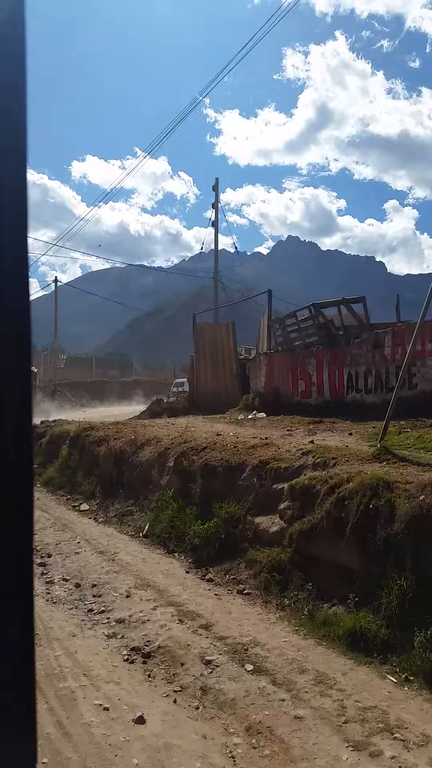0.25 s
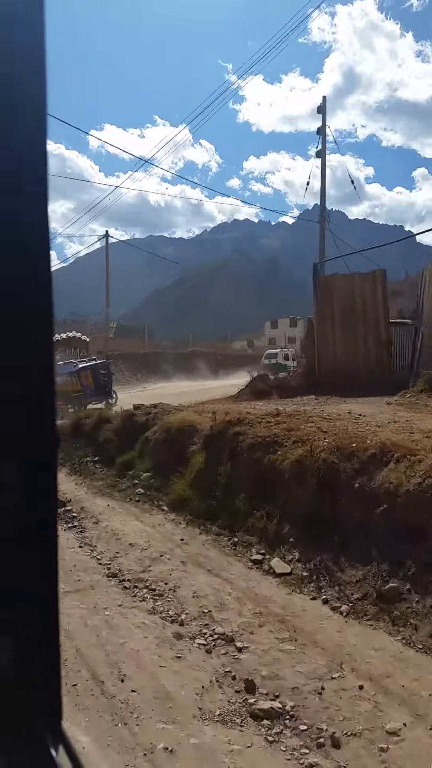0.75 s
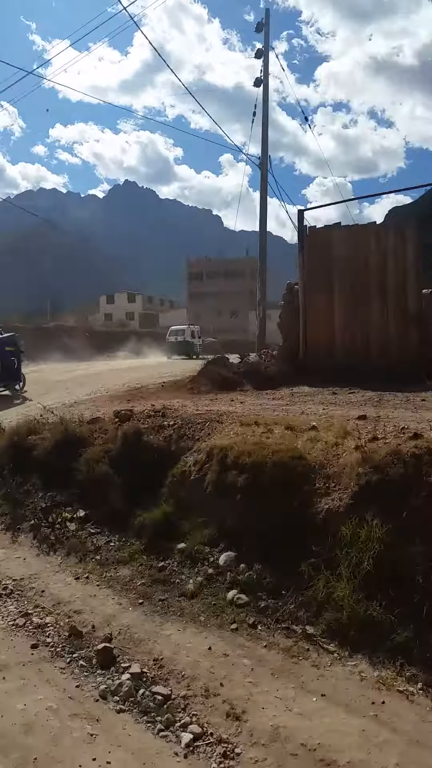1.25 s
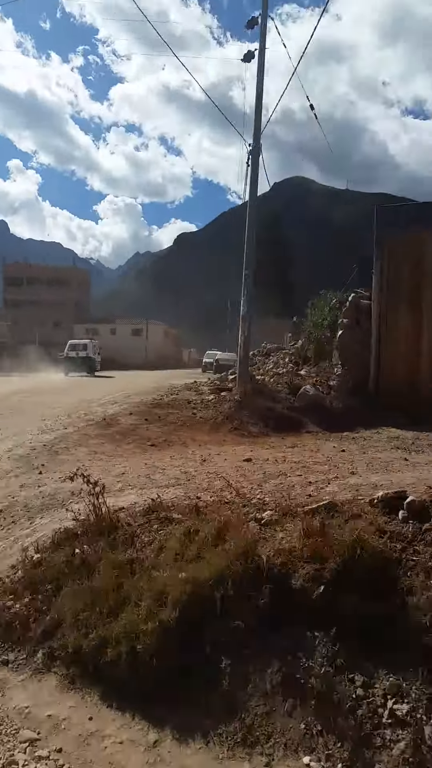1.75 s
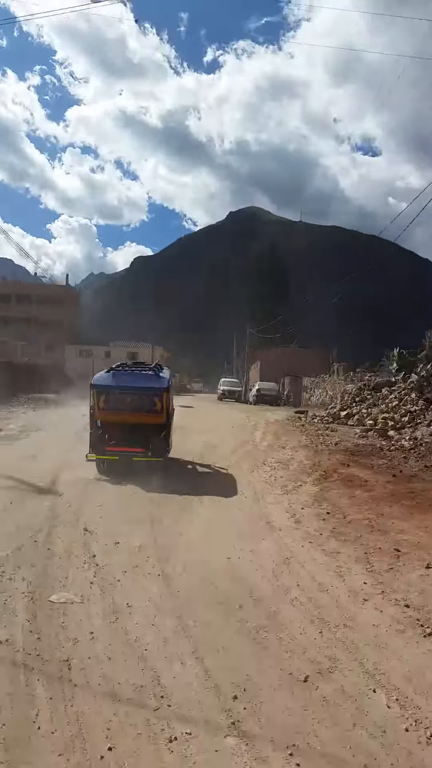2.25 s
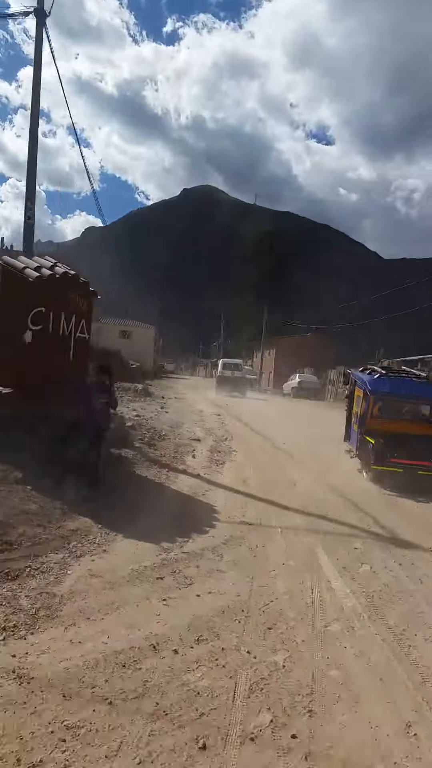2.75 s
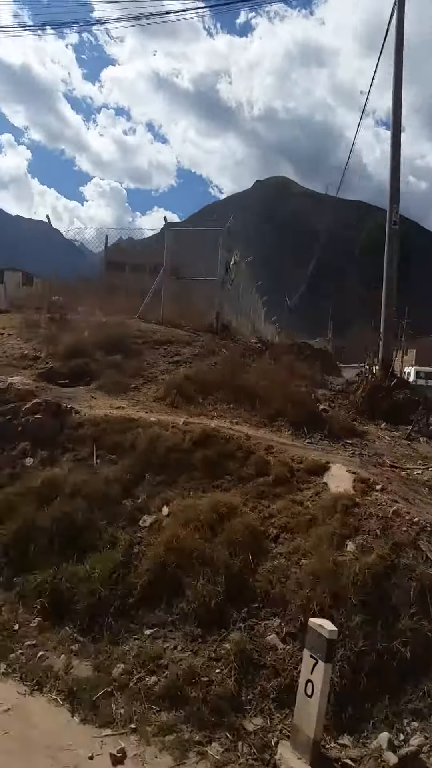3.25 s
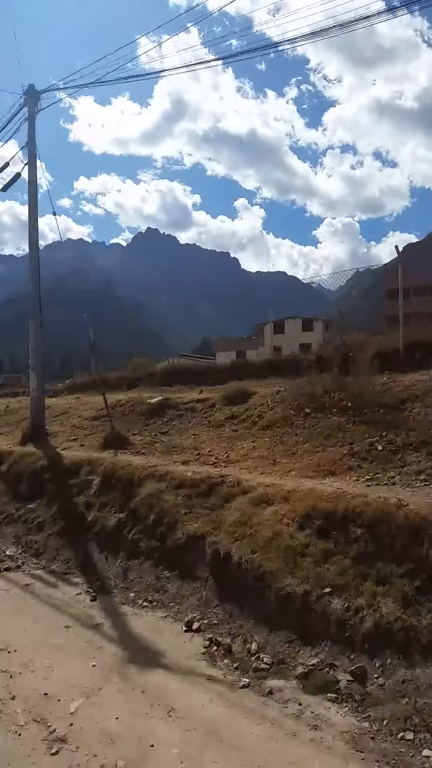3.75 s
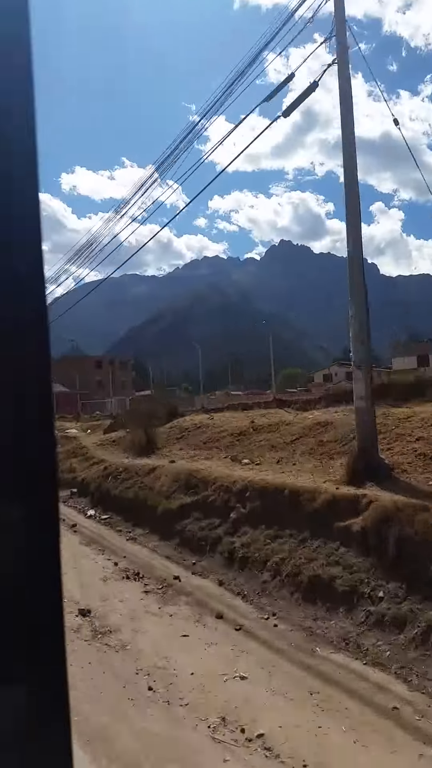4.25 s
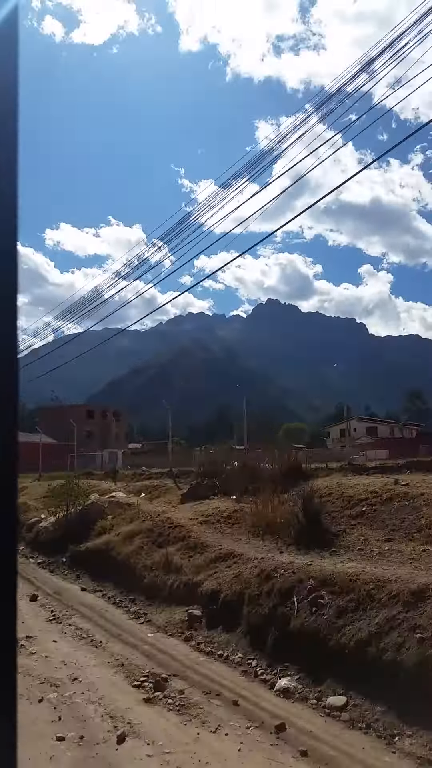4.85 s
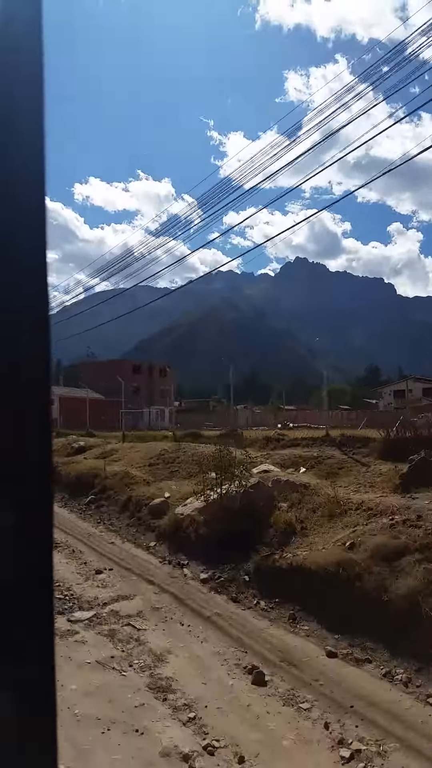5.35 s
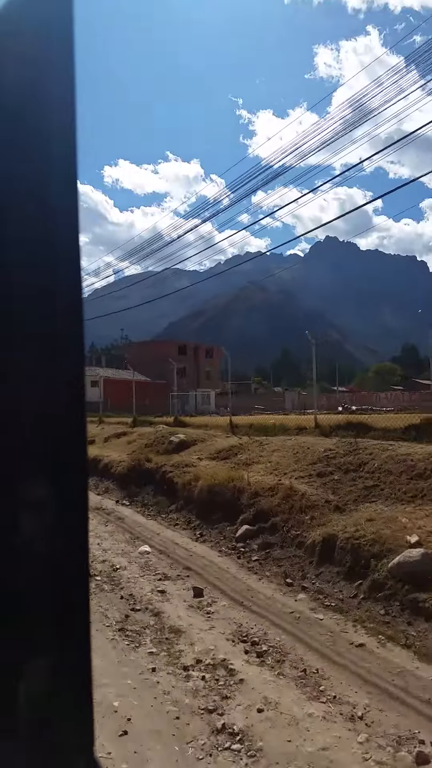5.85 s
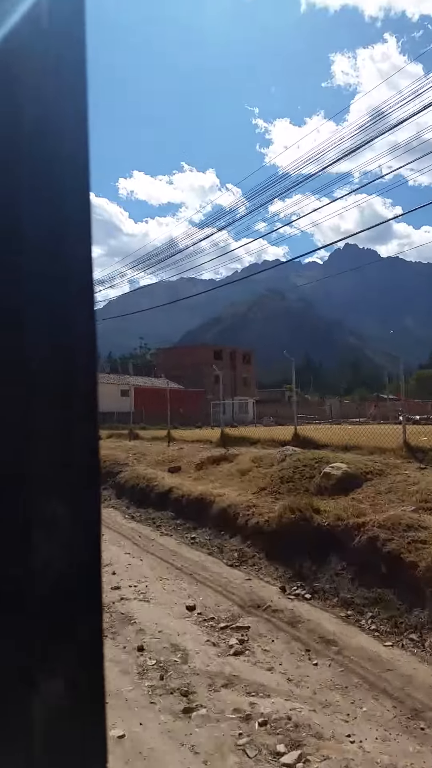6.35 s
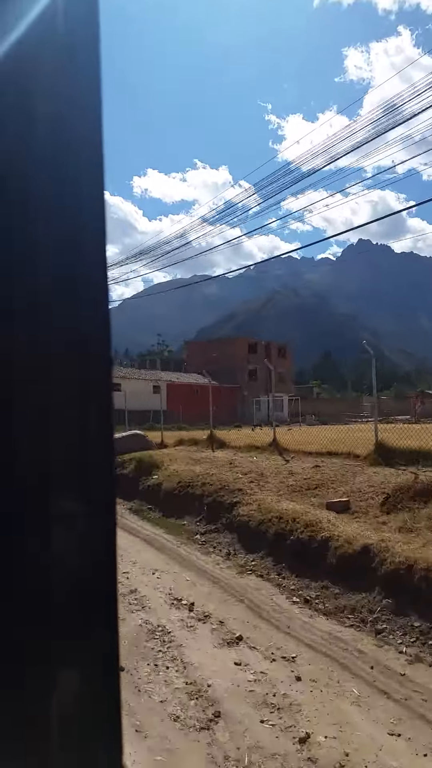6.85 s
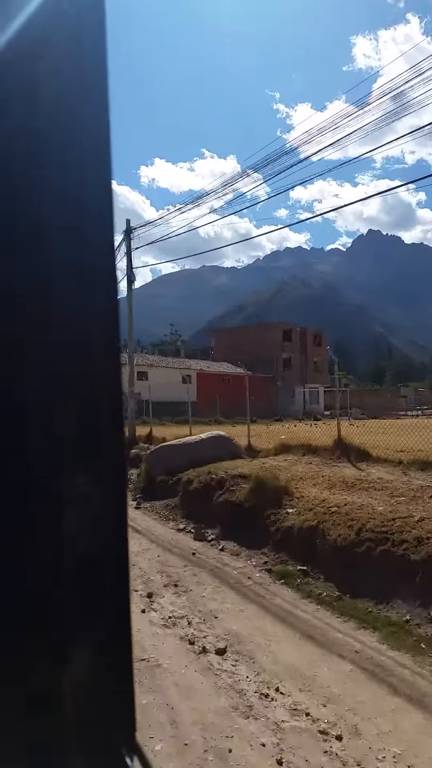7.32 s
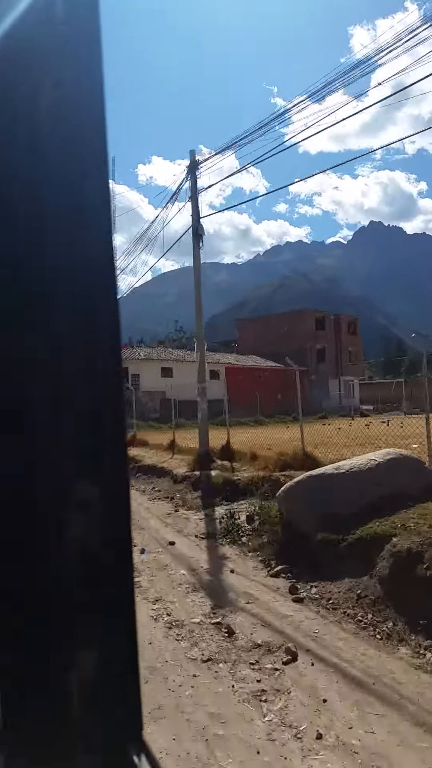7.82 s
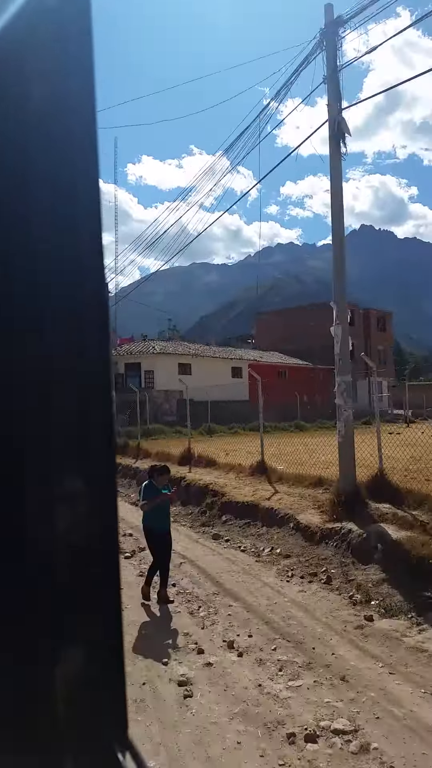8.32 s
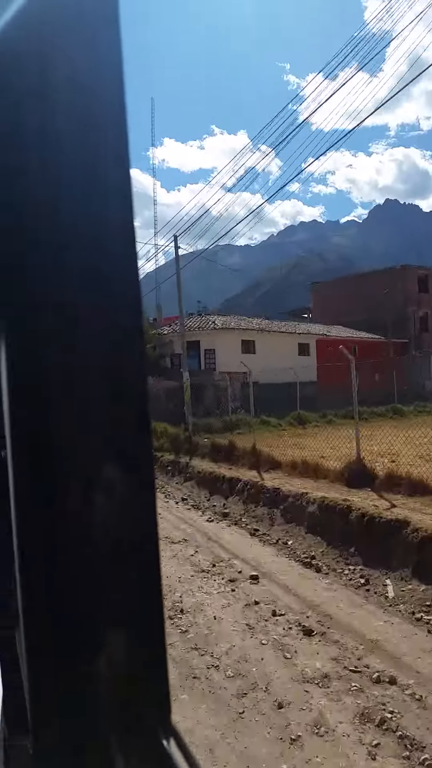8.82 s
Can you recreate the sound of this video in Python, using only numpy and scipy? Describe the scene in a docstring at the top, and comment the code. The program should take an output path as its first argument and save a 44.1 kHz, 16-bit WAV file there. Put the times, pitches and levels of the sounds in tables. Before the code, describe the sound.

A bus rumbles along a rough dirt road, engine droning and a loose window pane rattling, then wind buffeting hard at the open window.

```python
"""A bus drives along a rough dirt road, heard at its open side window.
Broadband noise makes the rumble of the body, the roar of tyres and the hiss of grit; the engine is a sum of orders.
Decaying modes make a loose pane and its latch chatter over bumps and stones knock on the floor.
Wind buffets the left microphone port in quick eddies, pulses that drive the limiter of both channels;
the right port lies in the lee and catches only a few."""
import sys
import numpy as np
from scipy import signal
from scipy.fft import rfft, irfft
from scipy.io import wavfile
from scipy.ndimage import uniform_filter1d, minimum_filter1d, map_coordinates

SR = 44100
rng = np.random.default_rng(int(sys.argv[2]) if len(sys.argv) > 2 else 0)


def dump(signal):
    """Clip the signal to [-1, 1] and save it as 16-bit WAV at the path in sys.argv[1]."""
    limited = np.clip(np.atleast_2d(signal).T, -1, 1)
    pcm = np.round(limited * 32767).astype(np.int16)
    wavfile.write(sys.argv[1], SR, pcm)


N = 400428
TIME, HZ = np.arange(N) / SR, np.fft.rfftfreq(N, 1 / SR)

# gusts at the window: start_s, length_s, relative level_db, relative eddy brightness_hz
WIND_GUSTS = [(0, .2, -17.5, 150), (0.245, .05, -20, 170), (0.443, .022, -15, 346.6),
              (0.83, 0.0151, -19, 220), (0.92, .08, -22, 86), (1.662, .05, -24, 171),
              (2.202, .12, -17, 100), (3.701, .08, -16, 126.1), (3.863, .22, -16, 170.7),
              (4.11, .13, -13, 235.8), (4.262, .11, -18.5, 280), (4.578, .02, -14, 181.3),
              (4.637, .14, -18, 198.7), (4.87, .125, -14.5, 256.2), (5.108, .07, -15.5, 297),
              (5.206, .085, -17.5, 259), (5.366, .03, -15, 270), (5.425, .13, -16, 266.8),
              (5.655, .21, -15, 240), (5.917, .22, -17, 302), (6.177, .21, -17, 284.6),
              (6.492, .26, -17, 245), (6.819, .16, -17, 226), (7.115, .15, -15, 299),
              (7.303, .045, -16, 279.2), (7.379, .16, -17, 232), (7.59, .28, -16, 331.4),
              (7.902, .43, -16.5, 345), (8.372, .17, -14.5, 418), (8.578, .25, -15.5, 376),
              (8.88, .2, -15, 385)]
BREEZE_DB = -30.5  # the wind between gusts, on the same scale


def amp(db):
    """Level is logarithmic: decibels to amplitude gain."""
    return 10 ** (np.asarray(db) / 20)


def unit(x):
    """Root-mean-square normalisation: scales to rms 1."""
    return x / np.sqrt(np.mean(x ** 2) + 1e-20)


def curve(rows, column):
    """Linear interpolation: one column of a time table at every sample."""
    rows = np.array(rows)
    return np.interp(TIME, rows[:, 0], rows[:, column])


def read(points, hz):
    """Interpolates a spectrum table along a log-frequency axis."""
    f, value = np.transpose(points)
    return np.interp(np.log(hz + 1), np.log(f + 1), value)


def noise(spectrum):
    """Spectral shaping: white noise takes a given colour, at rms 1."""
    white = rfft(rng.standard_normal(N))
    return unit(irfft(white * amp(read(spectrum, HZ)), N))


def wander(rate_hz):
    """Low-passed noise: slow random variation of rms 1, up to about rate_hz."""
    white = rfft(rng.standard_normal(N))
    return unit(irfft(white / (1 + (HZ / rate_hz) ** 4), N))


def pair(spectrum, shared):
    """Partial coherence: noise at both ports with a share of its power in common."""
    shared = np.clip(shared, 0, 1)
    common = np.sqrt(shared) * noise(spectrum)
    separate = np.array([noise(spectrum), noise(spectrum)])
    return common + np.sqrt(1 - shared) * separate


def lean(x, side):
    """Interchannel level difference: tips a stereo sound towards one port, band by band."""
    return irfft(rfft(x) * amp(np.outer([.5, -.5], read(side, HZ))), N)


def add(mix, s, sound):
    """Superposition: mixes a sound in at time s, trimmed to the mix."""
    start = round(s * SR)
    sound = sound[max(-start, 0):]
    part = mix[max(start, 0):][:len(sound)]
    part += sound[:len(part)]


def road():
    """Broadband excitation: the body booms over ruts and heaves; tyres roar and spray grit, unevenly."""
    # roughness of the ride: time_s, relative rumble_db, relative roar_db, relative grit_db
    ride = [(0, -13.5, -44, -63), (.6, -21.5, -42, -59), (.8, -20.5, -45, -64.5),
            (1.4, -23.5, -43.5, -64.5), (1.6, -23.5, -47, -70.5), (1.8, -23, -48.5, -71),
            (1.9, -19.5, -41, -63), (2.13, -15.5, -40, -60), (2.2, -12.5, -37.5, -57.5),
            (2.85, -11.5, -37, -56.5), (3.6, -12, -36.5, -55), (3.9, -17, -41, -63),
            (4.2, -20.5, -43.5, -69.5), (4.45, -23, -48, -77.5), (4.72, -19.5, -47, -78.5),
            (5.2, -21, -50, -85.5), (6.3, -26, -53.5, -88.5), (7.4, -22.5, -48, -84), (8.3, -24, -54, -86),
            (9.05, -25, -51, -86)]
    # the body heaves on its springs over a bump: time_s, level_db
    heave = [(1.65, -62), (1.85, -25.5), (2.4, -21), (2.8, -30), (3.2, -60)]
    # spectra of heave, body rumble, tyre roar and fine grit: frequency_hz, relative density_db (per Hz)
    springs_spectrum = [(12, -14.5), (26, 3), (42, 0.5), (80, -20.5), (250, -63.5), (1000, -100)]
    rumble_spectrum = [(4, -30.5), (10, -16), (22, -4), (45, -0.5), (85, -0.5), (135, -0.5), (200, -5),
                       (300, -13), (450, -20), (700, -35.5), (1100, -39.5), (3000, -91.5)]
    roar_spectrum = [(150, -12), (450, 8.5), (750, 6.5), (1050, 5.5), (1450, -2), (1850, -3), (2050, -2),
                     (2700, -4), (3100, -9.5), (3600, -20), (5000, -33.5), (7000, -52.5)]
    grit_spectrum = [(2000, -4.5), (3500, 7.5), (5000, 3.5), (6300, -2.5), (8000, -0.5), (9800, -3),
                     (11500, -2.5), (14000, -10.5), (16000, -16.5)]
    # balance of roar and grit: frequency_hz, left_minus_right_db
    roar_side = [(450, 5.5), (1000, 2), (1700, 6.5), (2700, -3.5), (5000, 5)]
    grit_side = [(3000, 3.5), (5000, -1), (6400, 0), (8000, 15), (11000, -1.5), (15000, 2)]
    # grit thrown up in sprays and single ticks: time_s, half_length_s (to 1/e), relative level_db
    spray_rows = [(2.78, .04, -57), (3.813, 0.033, -55), (5.546, 0.0022, -66), (5.647, 0.0017, -70),
                  (5.86, 0.002, -74)]

    rumble_db = curve(ride, column=1) + [[-3.2], [-2.6]] + 1.0 * wander(rate_hz=4.5)
    rumble = pair(rumble_spectrum, shared=0.66) * amp(rumble_db)
    heaving = noise(springs_spectrum) * amp(curve(heave, column=1))
    roar_db = curve(ride, column=2) + 5.5 + 1.5 * wander(rate_hz=32)
    roar = pair(roar_spectrum, shared=0.26) * amp(roar_db)
    sprays = sum(amp(db) * np.exp(-np.minimum(((TIME - s) / half) ** 2, 20)) for s, half, db in spray_rows)
    grit_gain = (amp(curve(ride, column=3)) + sprays) * amp(7.0 + 1.4 * wander(rate_hz=33))
    grit = pair(grit_spectrum, shared=0.18) * grit_gain
    return rumble + heaving + lean(roar, roar_side) + lean(grit, grit_side)


def engine():
    """Harmonic orders swell as the bus sways; noise pulsing at the firing rate excites block and panel resonances."""
    # course of the engine: time_s, firing_rate_hz (before jitter), relative level_db
    course = [(0, 89.5, -24), (1.2, 91.23, -29), (1.75, 92.5, -38), (2.05, 93.1, -17), (2.35, 92.7, -15.5),
              (2.66, 93.73, -11.5), (2.9, 94.04, -18.5), (3.3, 93.7, -17.5), (3.5, 94.4, -23),
              (3.63, 94.8, -11.5), (3.88, 95.2, -21), (4.32, 94.6, -17.5), (4.5, 94.3, -32.5),
              (7.5, 98.5, -26.5), (9.1, 107, -41)]
    # orders, at successive half multiples of the firing rate: relative level_db
    orders_db = [-12, -1, -7.5, -15, -25, -20.5, -21.5]
    # ringing of engine block and panels: frequency_hz, width_hz, relative level_db
    clatter = [(925, 260, -67.5), (1785, 70, -57.5), (2240, 63, -61), (2730, 350, -71), (3840, 130, -86)]

    turns = np.cumsum(curve(course, column=1) * (1 + 0.003 * wander(rate_hz=4))) / SR  # one per firing
    orders = np.zeros(N)
    for k, db in enumerate(orders_db):
        phase = np.pi * (k + 1) * turns + 2 * np.pi * rng.random()
        orders += amp(db + 0.6 * wander(rate_hz=4.1)) * np.sin(phase)
    orders = orders * amp(curve(course, column=2)) * amp([[-.5], [.5]])
    knocks = rng.standard_normal((2, N)) * unit(1 + .5 * np.cos(2 * np.pi * turns))
    body = sum(amp(db) * unit(1 / (1 + ((HZ - hz) / width) ** 2) ** 2) for hz, width, db in clatter)
    return orders + irfft(rfft(knocks) * body, N)


def tone(rows, jitter, flutter_db):
    """Frequency and amplitude modulation: one wavering sine on a track of pitch and level."""
    turns = np.cumsum(curve(rows, column=1) * (1 + jitter * wander(rate_hz=32))) / SR
    level_db = curve(rows, column=2) + flutter_db * wander(rate_hz=14.0)
    sounding = (TIME >= rows[0][0]) & (TIME <= rows[-1][0])
    return np.sqrt(2) * np.sin(2 * np.pi * turns) * amp(level_db) * sounding


def engine_fan():
    """Periodic excitation: a belt-driven fan on the engine adds a second drone."""
    # before jitter and flutter: time_s, pitch_hz, level_db
    drone = [(0, 250.6, -41.5), (1.8, 256.6, -40), (3.4, 253, -33), (4.8, 258.5, -41), (9.1, 268, -49.5)]
    return tone(drone, jitter=0.0021, flutter_db=2.5)


def panel_boom():
    """Panel resonance: a body panel booms in a narrow band on the roughest stretch."""
    # before jitter, flutter and balance: time_s, pitch_hz, level_db
    boom = [(2.05, 202.7, -42), (2.3, 203.5, -34), (2.6, 205, -45), (2.95, 202, -26.5), (3.2, 203.5, -37)]
    return tone(boom, jitter=0.012, flutter_db=3.0) * amp([[1.5], [-5]])


def whistle():
    """Frequency glide: a thin whistle falls in pitch."""
    # before jitter and flutter: time_s, pitch_hz, level_db
    glide = [(3.85, 1720, -63), (3.96, 1650, -56), (4.04, 1575, -50), (4.12, 1490, -53), (4.25, 1390, -63)]
    return tone(glide, jitter=.003, flutter_db=1)


def strikes(rows, modes, contact_s, scatter, level_db):
    """Modal impact: a hard contact and a scatter of tiny ones ring a part gripped a little differently each time."""
    t, out = np.arange(SR // 12) / SR, np.zeros((2, N))
    for s, db in rows:
        grip = 1 + 0.025 * rng.standard_normal()  # shifts all modes together
        for port in out:
            ring = sum(amp(g - 60 * t / t60) * np.sin(2 * np.pi * (grip * hz * t + rng.random()))
                       for hz, g, t60 in modes)
            ring = ring * (1 - np.exp(-t / 0.00055))  # soft onset
            contacts = rng.standard_normal(len(t)) * np.exp(-np.minimum((t / contact_s) ** 2, 20))
            contacts = (t == 0) + scatter * contacts / np.linalg.norm(contacts)
            knock = signal.fftconvolve(contacts, ring)[:len(t)]
            add(port, s, knock / abs(knock).max() * amp(db + level_db))
    return out


def pane():
    """Modal impact: the loose pane strikes its frame and rings."""
    # blows: time_s, relative peak level_db
    rattles = [(2.186, -17.5), (2.196, -33), (2.203, -24), (2.2462, -15.5), (2.535, -19), (2.592, -18.5),
               (2.7835, -20.5), (2.7985, -21), (2.852, -16.5), (2.889, -13), (2.9145, -13.5), (2.925, -15),
               (2.953, -21), (2.9765, -13), (2.983, -24), (3.0307, -19.5), (3.3097, -18.5), (3.3675, -13.5),
               (3.426, -17.5)]
    # modes of the pane in its frame: nominal frequency_hz, relative level_db, t60_s
    pane_modes = [(418, 5, 0.043), (573, -2, 0.044), (876, 0.5, 0.03), (1140, -4.5, 0.011),
                  (1300, -3, .016), (1420, -3, .018), (1620, -8.5, 0.02), (1840, -4, 0.015),
                  (2150, -2, .02), (2460, -0.5, 0.0084), (2690, -4, 0.011), (2900, -9.5, 0.013)]
    return strikes(rattles, pane_modes, contact_s=0.0057, scatter=1.7, level_db=2.5) * amp([[-2.2], [2.2]])


def latch():
    """Modal impact: the window latch ticks, with few and high modes."""
    # blows: time_s, relative peak level_db
    ticks = [(1.866, -24.5), (1.931, -25), (2.1365, -22.5), (2.196, -17), (2.2025, -29)]
    # modes of the latch: nominal frequency_hz, relative level_db, t60_s
    latch_modes = [(2235, -9, 0.013), (2560, 0, 0.021), (2799, -8, 0.015)]
    return strikes(ticks, latch_modes, contact_s=0.0025, scatter=0.35, level_db=-3.5) * amp([[-2.5], [2.5]])


def stones():
    """Modal impact: stones knock against the floor and excite its low modes."""
    # blows: time_s, peak level_db
    knocks = [(5.5345, -14), (5.542, -17), (5.647, -9), (5.859, -11.5), (5.983, -14)]
    # modes of the floor: nominal frequency_hz, relative level_db, t60_s
    floor_modes = [(185, 6.5, 0.074), (377, 2.5, .05), (700, -10, 0.037), (1260, -8, 0.015)]
    return strikes(knocks, floor_modes, contact_s=.004, scatter=0.58, level_db=0.0)


def wind():
    """Envelope of the flow, in dB: each gust rises, holds and dies back into the breeze, exponentially."""
    attack_s, release_s = .008, .016
    gain = np.full(N, amp(BREEZE_DB))
    for start, length, db, _ in WIND_GUSTS:
        early, late = np.maximum(start - TIME, 0), np.maximum(TIME - start - length, 0)
        gust = amp(db) * np.exp(-np.minimum(early / attack_s + late / release_s, 20))
        gain = np.maximum(gain, gust)
    return 20 * np.log10(gain)


def buffet(wind_db, unrest, pressure_power, level_db, flutter_db):
    """Advection: turbulence is swept past the port, both louder and higher when the flow quickens."""
    # frequency_hz, relative density_db (per Hz), before the sweeping
    turbulence = [(15, -27.5), (45, -12.5), (80, -1), (130, -3), (200, -4), (300, -9.5), (450, -14),
                  (700, -29), (1100, -34.5), (2500, -91)]
    speed = np.exp(unrest * np.tanh(wander(rate_hz=40) / 2))
    swept = np.cumsum(speed / speed.mean())
    pressure = map_coordinates(noise(turbulence), [swept], order=3, mode="wrap") * speed ** pressure_power
    # the slow rms is levelled before the wind envelope is applied
    strength = np.sqrt(uniform_filter1d(uniform_filter1d(pressure ** 2, size=3500), size=1500))
    return pressure / strength * amp(wind_db + level_db + flutter_db * wander(rate_hz=11.0))


def eddies(rows, low_hz, port_hz, leak_db, ring, ring_hz, ring_width_hz, trail, trail_s):
    """Vortex pressure pulses: each is a push or pull coloured by its trailing edge; the port rings and muffles."""
    size, out = 2048, np.zeros(N)
    hz = np.fft.rfftfreq(size, 1 / SR)
    port = hz ** 2 / (hz ** 2 + low_hz ** 2) * (amp(leak_db) + 1 / np.sqrt(1 + (hz / port_hz) ** 8))
    port = port * (1 + ring / (1 + 2j * (hz - ring_hz) / ring_width_hz))
    for (s, db, bright_hz), (turn, trail_turn, lag) in zip(rows, rng.random((len(rows), 3))):
        shape = port * np.exp(-hz / bright_hz)
        trailing = trail * np.exp(2j * np.pi * (trail_turn - hz * trail_s * (.5 + lag)))
        edges = (1 + trailing) / np.hypot(1, trail)
        # a random phase turn makes it push, pull or swing through both
        flick = irfft(shape * edges * np.exp(2j * np.pi * turn), size) / irfft(shape, size)[0]
        add(out, s - size / 2 / SR, amp(db) * np.fft.fftshift(flick))
    return out


def wakes(rows, count, spread_s, level_db):
    """Vortex clustering: each eddy travels among a few weaker, softer ones, most of them just behind it."""
    parent = np.repeat(rows, count, axis=0)
    force, size, place = rng.standard_normal((len(parent), 3)).T
    s = parent[:, 0] + spread_s * (place + .4 + .5 * np.sign(place + 0.59))
    db = parent[:, 1] + level_db + 3 * np.tanh(force)
    bright_hz = parent[:, 2] * .8 * np.exp(.3 * np.tanh(size))
    return np.c_[s, db, bright_hz]


def gust_eddies(wind_db, count, level_db, spread_db, brightness, variety, small_loss_db):
    """Density follows the flow: eddies crowd into gusts, with their force and size; smaller ones are weaker."""
    chance, force, size = rng.random((count, 3)).T
    arrivals = np.cumsum(amp(wind_db) - .9 * amp(BREEZE_DB))  # few arrive in the lulls
    s = np.interp((np.arange(count) + chance) / count, arrivals / arrivals[-1], TIME)
    start, length, _, gust_hz = np.transpose(WIND_GUSTS)
    nearest = np.argmin(abs(s[:, None] - start - length / 2) - length / 2, axis=1)
    smallness = 2 * size - 1
    db = np.interp(s, TIME, wind_db) + level_db + spread_db * (2 * force - 1) - small_loss_db * smallness
    return np.c_[s, db, gust_hz[nearest] * brightness * np.exp(variety * smallness)]


def windward_port():
    """Turbulent pressure at the left port: gusty buffeting plus timed eddies, their companions and random ones."""
    # individually timed eddies, hard and faint:
    # time_s, nominal peak level_db, brightness_hz (higher for smaller eddies)
    timed = [(0.0556, -21, 410.0), (0.0703, -6, 250), (0.1326, -12, 550), (0.1831, -4, 373),
             (0.188, 4, 328), (0.1947, -2, 262), (0.2685, -21, 680), (0.4515, 3.5, 505), (0.4548, 3.5, 420),
             (0.4608, -7, 560.0), (0.4675, 5, 264), (0.5, -3.5, 90), (0.7175, 1, 196), (0.7215, 0, 170),
             (0.8344, -3.5, 259.6), (0.8448, -4.5, 670.0), (0.8525, 5.5, 326), (0.935, -12, 131),
             (0.972, -5.5, 75.7), (1.7012, -7, 190), (2.8419, 0, 320.0), (3.1146, -5, 299),
             (3.7113, -8, 320), (3.8782, -1, 266.6), (3.9353, -3, 330.0), (4.0406, -6, 300.5),
             (4.0591, -23, 380.0), (4.1181, 3.5, 619), (4.151, 4, 71), (4.1749, 2, 290), (4.1837, -7, 423),
             (4.1917, -1, 599), (4.2065, -1, 419.3), (4.2127, -8, 488), (4.2329, -9, 220),
             (4.2723, -4.5, 544), (4.3348, -1, 440.0), (4.3424, -4, 892), (4.359, -0.5, 227.4),
             (4.586, -8, 205), (4.6627, -6, 395), (4.677, -10, 379.4), (4.7003, -6.5, 327),
             (4.7797, 6, 743), (4.8107, -2, 220), (4.8239, -2, 379), (4.8752, -4, 619), (4.8861, -0.5, 723),
             (4.8932, -6, 505), (4.9114, 3.5, 660), (4.9612, -4, 542), (5.1091, 0.5, 544),
             (5.1136, -6.5, 439), (5.1301, -7.5, 423), (5.1361, -1.5, 404), (5.1536, -12.5, 700),
             (5.1727, -7.5, 350.4), (5.2135, -9.5, 490), (5.2684, -10.5, 480), (5.2798, -4, 400),
             (5.3696, -8.5, 387), (5.3772, -6, 412), (5.3862, -5, 409), (5.3917, -6, 622),
             (5.4259, -4, 892), (5.4323, -3, 408.4), (5.44, -3.5, 773), (5.4446, -7, 680),
             (5.4551, -4.5, 380), (5.531, 0, 70), (5.5356, -7, 600), (5.5919, -6.5, 380), (5.6571, -8, 700),
             (5.6796, -7, 440.0), (5.708, -6.5, 81), (5.7182, -4, 968), (5.7428, -6.5, 572.4),
             (5.7541, -2, 170), (5.7587, -8, 582), (5.7769, -8, 436.5), (5.8337, -11, 578.6),
             (5.8454, 1, 279), (5.9368, -4.5, 720.0), (5.9768, 2.5, 541), (6.0126, -6.5, 670.0),
             (6.0195, -6, 828), (6.0751, -3.5, 334), (6.0882, -14, 470), (6.1077, -4, 460),
             (6.1306, -3.5, 670.0), (6.1725, -7.5, 450), (6.2188, -7, 572), (6.2316, -0.5, 671),
             (6.2429, -10, 500), (6.2637, -15, 395), (6.314, -22, 89.9), (6.3437, -5, 670.0),
             (6.397, -4, 120), (6.5132, -6, 440.0), (6.537, -7.5, 70), (6.6018, -2, 440.0),
             (6.6162, -3, 381.3), (6.68, -8.5, 270.6), (6.757, -12.5, 750), (6.8524, -6.5, 260.0),
             (6.8661, -6.5, 770), (6.899, -1, 107.7), (6.9137, -18, 400), (6.9462, -4.5, 460),
             (6.966, -1.5, 130.6), (6.9775, -7, 359.4), (7.056, -6, 204.4), (7.1195, -4, 220),
             (7.1363, -18, 500), (7.1406, -5, 404.4), (7.1415, -13, 1401), (7.1543, 0, 960),
             (7.1726, 4.5, 900), (7.1841, -18, 552), (7.197, -1, 726), (7.2055, 0.5, 582),
             (7.2349, -11, 538), (7.2656, -1, 330.0), (7.3069, -4, 442), (7.3298, -1, 327),
             (7.3877, -5, 233.3), (7.436, -17, 473), (7.4385, -9, 850), (7.4653, 0.5, 380.4),
             (7.493, -6, 70), (7.5096, -0.5, 350.6), (7.58, -1.5, 240), (7.6037, 0.5, 326),
             (7.6167, -8, 496.7), (7.6585, -3.5, 580.0), (7.6815, -4, 1108), (7.6864, -4, 780),
             (7.6922, -16, 759), (7.6981, 3, 269), (7.7038, -1.5, 897), (7.7498, -0.5, 1364),
             (7.7607, -5, 700), (7.764, 2, 70), (7.7827, -3.5, 2250.0), (7.7927, -0.5, 960.0),
             (7.8142, -2, 960.0), (7.85, 4.5, 825), (7.8571, -6, 1300), (7.9027, -5, 340),
             (7.9146, -5.5, 797), (7.9298, -7, 410.0), (7.9554, -3.5, 550), (7.967, -10, 468),
             (7.9734, -15, 600), (8.0541, -4, 674), (8.0595, -4, 583), (8.0721, -6, 720.0),
             (8.0909, 1.5, 1482), (8.1396, -8.5, 353), (8.1592, -6, 470.4), (8.1821, -8, 841),
             (8.2643, -1.5, 1050), (8.2839, -3, 678), (8.2905, -3, 270), (8.354, -3, 69.9),
             (8.3788, -2.5, 280.0), (8.392, -7, 687), (8.4124, 1, 619), (8.4293, 7.5, 670),
             (8.4742, -0.5, 620), (8.4998, -15, 770), (8.4945, 0, 723), (8.5147, -6, 1074),
             (8.518, -1, 431), (8.524, 4.5, 777), (8.5293, -4, 834), (8.5697, -3.5, 968),
             (8.6112, -2.5, 958), (8.6161, -19, 1085), (8.6613, -9, 443), (8.6733, -6, 1270.0),
             (8.6846, -6, 1252), (8.7104, -10, 334), (8.7467, -11, 768), (8.7833, -1.5, 437),
             (8.7938, -6.5, 898), (8.7994, 0, 468), (8.8107, -15, 630), (8.8321, -4, 619),
             (8.8376, -10, 656), (8.8909, -6, 268), (8.9033, -12, 670.0), (8.9195, -2.5, 820),
             (8.9444, -6, 552), (8.9546, -10, 900), (8.9617, -1, 380.0), (9.0019, -13, 490),
             (9.0301, -7, 580.0), (9.038, -16, 500), (9.0567, -5, 291)]
    wind_db = wind()
    scattered = gust_eddies(wind_db, count=700, level_db=-2.5, spread_db=5.5, brightness=1.2, variety=0.71,
                            small_loss_db=5)
    companions = wakes(timed, count=2, spread_s=.004, level_db=-12.0)
    buffeting = buffet(wind_db, unrest=.55, pressure_power=1.4, level_db=2.0, flutter_db=-0.05)
    pulses = eddies(np.vstack([timed, scattered, companions]), low_hz=240, port_hz=2900, leak_db=-17.0,
                    ring=0.24, ring_hz=810, ring_width_hz=420, trail=0.56, trail_s=0.00074)
    return buffeting + pulses


def lee_port():
    """Sheltering: only a few eddies curl round to the right port."""
    # time_s, nominal peak level_db, brightness_hz
    lee_rows = [(8.025, -15, 150), (8.135, -14, 300), (8.293, -18, 350), (8.342, -12, 300),
                (8.382, -26, 350), (8.652, -18, 200)]
    return eddies(lee_rows, low_hz=240, port_hz=1792, leak_db=-24,
                  ring=.35, ring_hz=789, ring_width_hz=420, trail=0.4, trail_s=0.00064)


def scene():
    """Superposition: bus and road reach both ports, and each port adds its own wind."""
    bus = road() + engine() + engine_fan() + panel_boom() + whistle()
    bus = bus + pane() + latch() + stones()
    return bus + np.array([windward_port(), lee_port()])


def limit(x, ceiling_db, recovery_db_per_s):
    """Gain reduction: peaks over the ceiling pull both channels down at once; the gain then creeps back."""
    over_db = np.maximum(20 * np.log10(abs(x).max(0) + 1e-9) - ceiling_db, 0)
    over_db = -minimum_filter1d(-over_db, size=131)  # the highest nearby peak
    fall = TIME * recovery_db_per_s
    held_db = np.maximum.accumulate(over_db + fall) - fall
    return x * amp(-uniform_filter1d(uniform_filter1d(held_db, size=65), size=65))


def record(dry):
    """Saturation: the microphone gives softly under the hardest eddies; then the limiter and the band limit."""
    overload, ceiling_db, edge_hz = 4.2, -.3, 15750
    softened = overload * np.tanh(dry / overload)
    limited = limit(softened, ceiling_db, recovery_db_per_s=54.5)
    low_pass = signal.firwin(511, edge_hz, window=("kaiser", 9), fs=SR)
    return signal.oaconvolve(limited, low_pass[None], "same")


dry = scene()
out = record(dry)
dump(out)
```